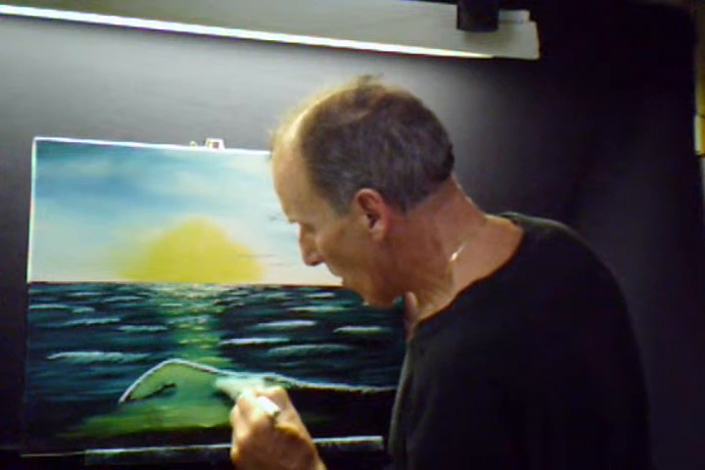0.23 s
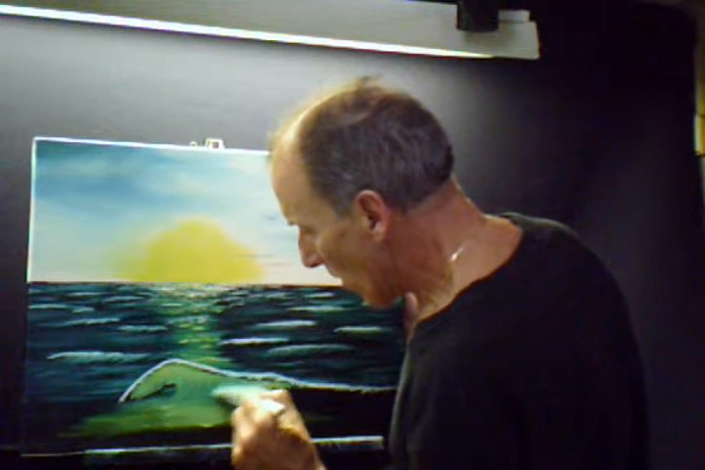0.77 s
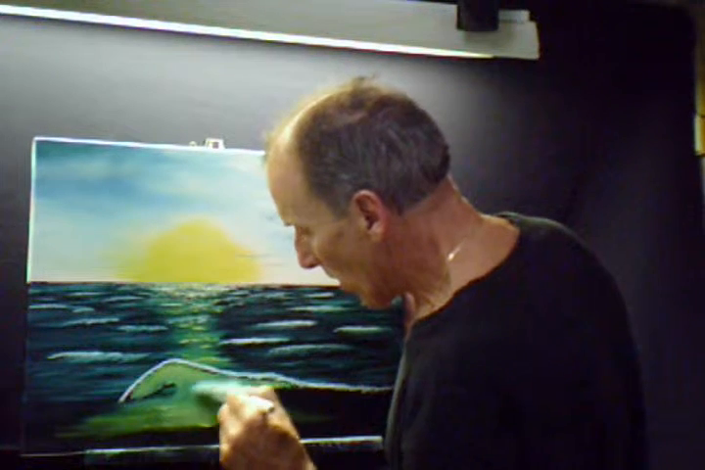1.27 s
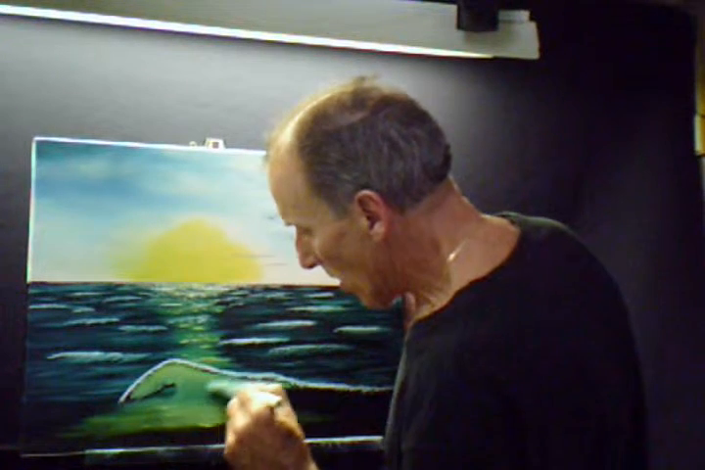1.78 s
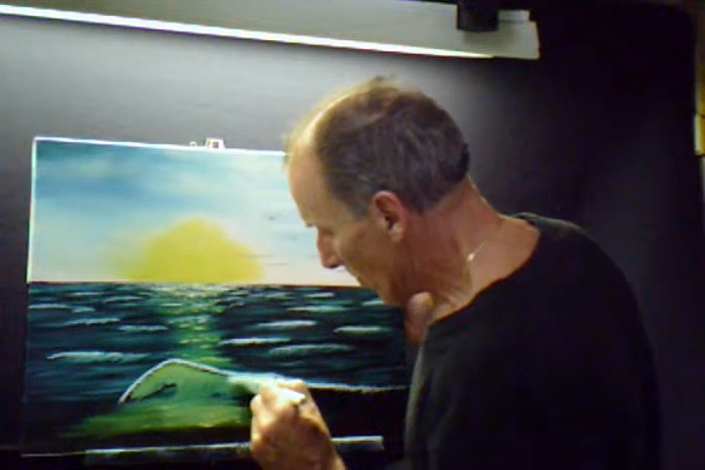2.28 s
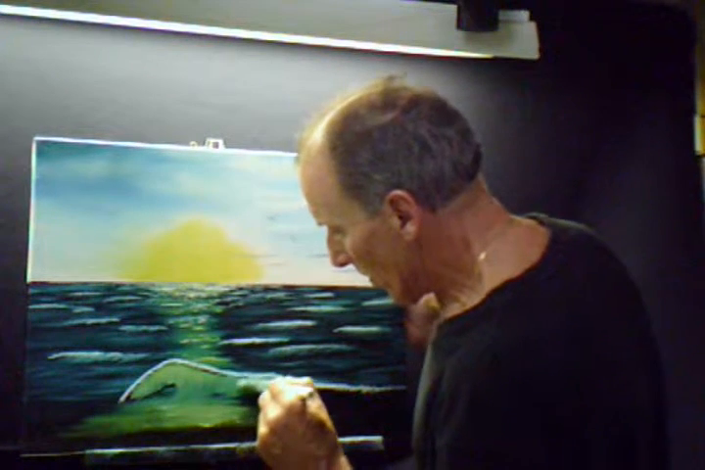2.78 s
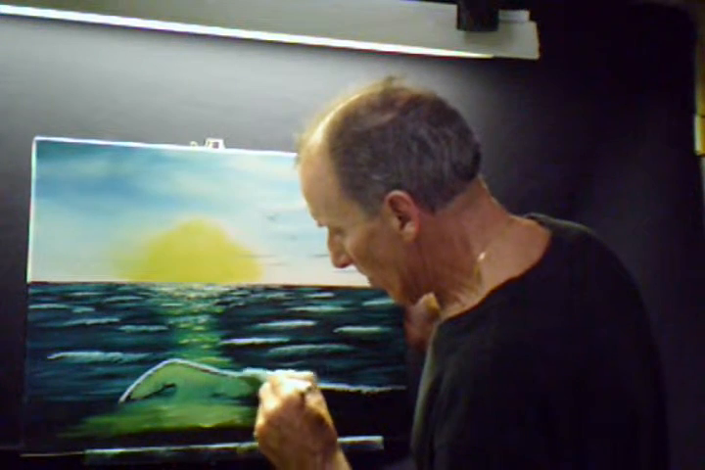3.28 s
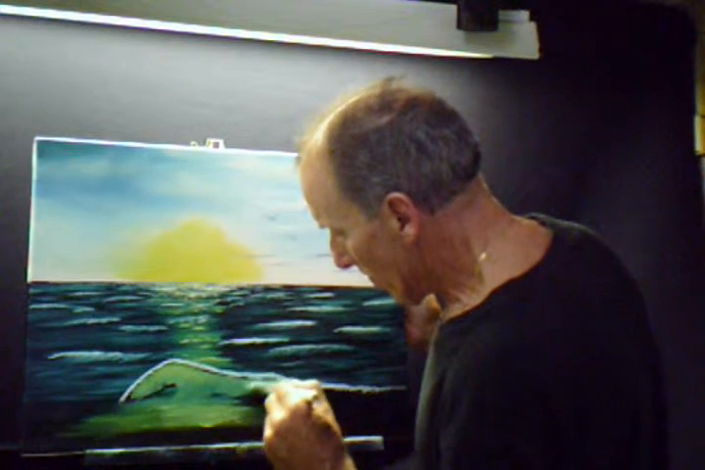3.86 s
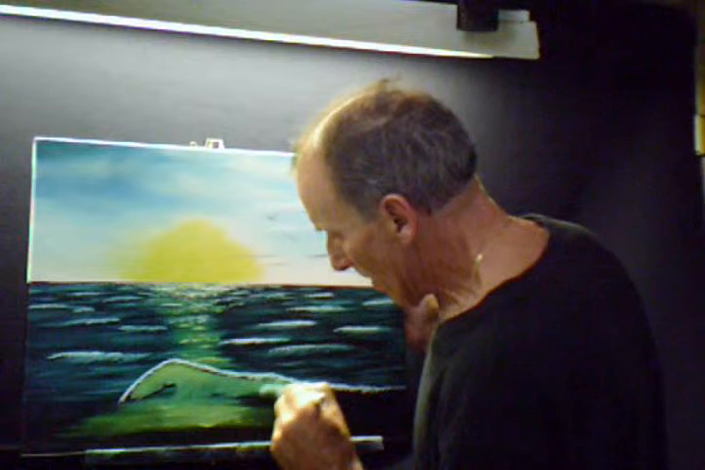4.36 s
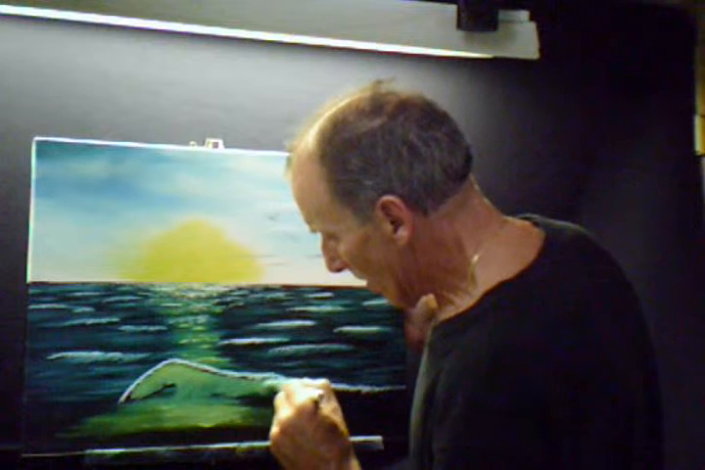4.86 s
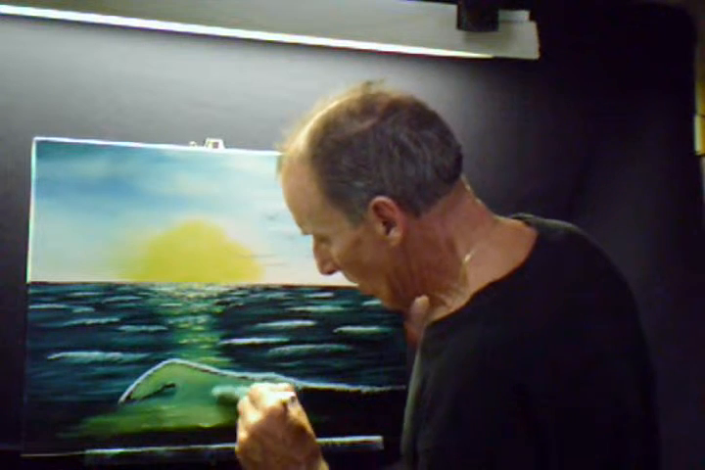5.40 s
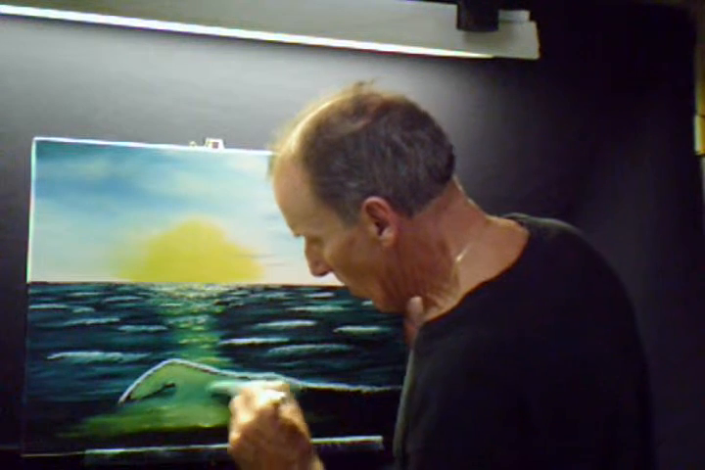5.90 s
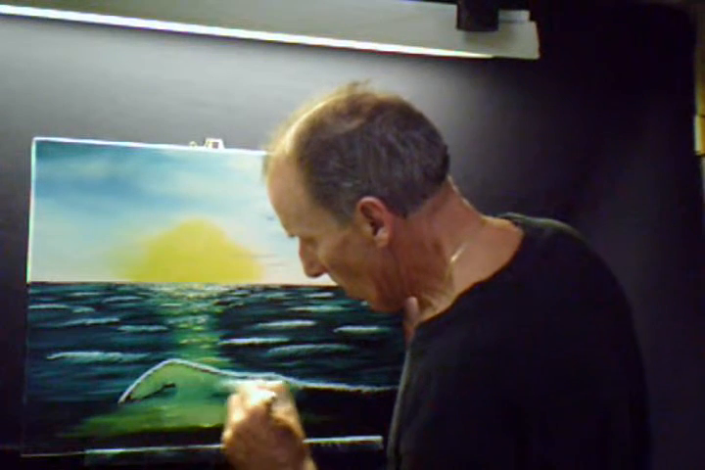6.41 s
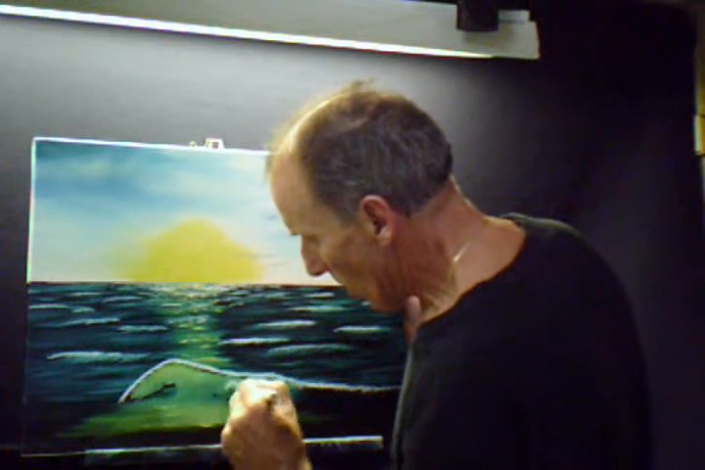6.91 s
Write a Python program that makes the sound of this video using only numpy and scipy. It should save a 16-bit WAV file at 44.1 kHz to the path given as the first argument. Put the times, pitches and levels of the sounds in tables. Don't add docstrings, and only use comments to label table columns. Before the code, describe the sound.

Quick blunt thuds, close and boomy, dominate from beginning to end, with no ringing and little audible room. Between them a small cheap microphone reveals its own noise: rumble, a low fluttering buzz, hiss pulsing about twenty times a second, faint steady whistles and very short sliding chirps. The level creeps upward and falls suddenly every second or so, sometimes with a muted click after a strong thump.

```python
import sys
import numpy as np
from scipy import signal
from scipy.fft import rfft, irfft
from scipy.io import wavfile
from scipy.ndimage import uniform_filter1d

SR = 44100
rng = np.random.default_rng(int(sys.argv[2]) if len(sys.argv) > 2 else 0)


def convert_level_to_amplitude(level_db):
    exponent = np.asarray(level_db, float) / 20
    return 10 ** exponent


def output_pcm(signal):
    pcm = np.clip(np.atleast_2d(signal).T, -1, 1) * 32767
    wavfile.write(sys.argv[1], SR, np.round(pcm).astype(np.int16))


N = 315182
LEAD = 1323
T_S = np.arange(N) / SR
EARLY_S = np.arange(-LEAD, N) / SR

# t/s, gain before/dB, gain after/dB, offset jump/full scale
GAIN_STEPS = [(0.0, 0.0, 0.8, 0.0), (0.2338, 3.5, -3.7, 0.0), (1.1394, 2.2, -6.9, -0.039),
              (2.2424, -0.6, -1.8, -0.004), (2.5442, 0.2, -0.6, -0.008), (2.9506, 0.6, -0.5, -0.009),
              (3.8561, 4.3, -6.2, -0.03), (4.7501, -1.8, 0.2, 0.003), (5.1332, 1.9, 3.2, -0.02),
              (5.4699, 4.6, -5.4, -0.034), (6.5729, -0.0, -2.9, -0.016), (7.15, 0.3, 0.0, 0.0)]
# t/s, length/ms, start f/Hz, end f/Hz, level/dB
BIRDIES = [(0.24, 18, 9140, 10360, -1), (0.447, 19, 1830, 7240, 0), (0.7378, 13, 4950, 9990, 0),
           (1.5439, 9.6, 7140, 11370, -3), (1.6517, 13, 7820, 8420, 0), (2.259, 13.5, 8250, 9980, -1),
           (2.5601, 15.5, 4650, 8550, 0), (2.9617, 12, 7940, 7600, -1), (3.0595, 16, 9120, 8050, -1),
           (4.262, 14, 4800, 9470, -4), (4.376, 16.5, 11370, 8300, -3), (4.7656, 7.1, 4940, 2560, 1),
           (5.4351, 7.2, 10300, 9400, 4.4), (5.8761, 15, 6700, 5800, 1.5), (6.0751, 25, 4960, 6180, -1.6),
           (6.578, 8.2, 6060, 4450, 2)]
# f/Hz, rms level/dB
WHINES = [(4200, -74), (5781, -80), (6200, -77), (7400, -77), (9600, -68.5), (10800, -84), (12450, -83)]
# f/Hz, density/dB per Hz
RUMBLE_SHAPE = [(2, -1), (5, 0.5), (18, -2), (50, -10), (100, -18), (300, -28), (700, -37), (2000, -46.5),
                (6000, -57)]
# f/Hz, density/dB per Hz
HISS_SHAPE = [(350, -22), (600, -4), (876, -9), (998, -6.5), (1580, -8), (3730, -9.5), (4250, -8.5),
              (7740, -10), (9530, -10), (12400, -30.5), (13600, -42)]
# rate f/Hz, start/cycle, end/cycle, load level/dB
CHORES = [
    (44.025, .31, .57, -22.6),
    (19.87, .26, .305, -27.5),
    (19.87, .7, .82, -31.1),
]
CHORE_LIMIT = 1.3

FRAME_HZ, BUSY_START, BUSY_SHARE = 19.87, .69, .57
RAMP_S, SETTLE_S, COUPLING_S, JUMP_S = .0046, .008, .0222, .06
THUMP_EVERY_S, FIRST_DUE_S, TICK_FRAMES, LONG_EVERY = .18195, -.044, 2, 3
TICK_S = TICK_FRAMES / FRAME_HZ
THUMP_START_S, SHORT_PUSH_S, LONG_PUSH_S, SLOP_S = -.0093, .0113, .0147, .0007
SHORT_DB, LONG_DB, HURRIED_DB, SCATTER_DB = -0.3, 0.27, -0.6, 0.67
TWEET_COUNT, TWEET_LOCKED, TWEET_LATE_S, TWEET_SPREAD_S = 50, .75, .046, .008
TWEET_MS, TWEET_HZ, TWEET_GLIDE_HZ, TWEET_DB = (6, 10.5), (4500, 11000), 2000, (-7, -1)


def thumps(load):
    held = np.repeat(rng.standard_normal(N // 60 + 1), 60)[:N]
    tremble = 1 + 0.13 * held + 0.023 * walk(200)
    total_load = load * np.append(np.ones(LEAD), tremble) + chores()
    dip = lag(total_load, SETTLE_S)
    return (lag(dip, COUPLING_S) - dip)[LEAD:]


def push():
    load = np.zeros(N + LEAD)
    for release_s, depth_db, push_ms in thump_rows():
        rise = np.clip((EARLY_S - release_s + push_ms / 1000) / RAMP_S, 0, 1)
        let_go = np.clip((release_s - EARLY_S) * SR, 0, 1)
        load += convert_level_to_amplitude(depth_db) * rise * let_go
    return load


def thump_rows():
    k = np.arange(int(N / SR / THUMP_EVERY_S) + 1)
    tick = np.ceil((FIRST_DUE_S + k * THUMP_EVERY_S) / TICK_S)
    late, longer, deeper = rng.standard_normal((len(k), 3)).T
    is_long = k % LONG_EVERY == 0
    hurried = np.diff(tick, prepend=-2) == 1
    length_s = np.where(is_long, LONG_PUSH_S, SHORT_PUSH_S) + SLOP_S * longer
    depth_db = np.where(is_long, LONG_DB, SHORT_DB) + HURRIED_DB * hurried + SCATTER_DB * deeper
    release_s = tick * TICK_S + THUMP_START_S + SLOP_S * late + length_s
    return zip(release_s, depth_db, 1000 * length_s)


def chores():
    load = 0
    for rate_hz, start, end, level_db in CHORES:
        cycle, phase = np.divmod(EARLY_S * rate_hz + 2, 1)
        scatter = np.minimum(rng.standard_normal(400), CHORE_LIMIT)
        weight = convert_level_to_amplitude(level_db + 4.3 * scatter[cycle.astype(int)])
        load = load + weight * (phase > start) * (phase < end)
    return load


def birdies(gate):
    sweeps = np.zeros(N)
    waver_hz = 350 * walk(900)
    for start_s, length_ms, from_hz, to_hz, level_db in list(BIRDIES) + tweet_rows():
        span = length_ms * SR / 1000 + 88
        u = np.arange(int(length_ms * SR / 1000) + 88) / span
        bend = u * u * (3 - 2 * u)
        glide_hz = (to_hz - from_hz) * (0.48 * u + 0.45 * bend)
        hz = from_hz + glide_hz + waver_hz[int(start_s * SR):][:len(u)]
        at = int(start_s * SR) - 44
        sweeps[at:at + len(u)] += convert_level_to_amplitude(level_db) * np.sin(np.pi * u) ** .5 * sweep(hz)
    stray_hz = np.abs(9000 + 6000 * walk(70))
    stray = gate * convert_level_to_amplitude(4.6 * walk(90)) * sweep(stray_hz)
    return dull(convert_level_to_amplitude(-50.5 + 2.0 * walk(500)) * sweeps + convert_level_to_amplitude(-59.5) * stray, 10500, order=6)


def tweet_rows():
    when, free, ms, hz, db = rng.random((TWEET_COUNT, 5)).T
    late, glide = rng.standard_normal((TWEET_COUNT, 2)).T
    free_s = TICK_S / 2 + when * (N / SR - 2 * TICK_S)
    locked_s = free_s // TICK_S * TICK_S + TWEET_LATE_S + TWEET_SPREAD_S * late
    start_s = np.where(free < TWEET_LOCKED, locked_s, free_s)
    from_hz = between(hz, TWEET_HZ)
    to_hz = from_hz + TWEET_GLIDE_HZ * glide
    return list(zip(start_s, between(ms, TWEET_MS), from_hz, to_hz, between(db, TWEET_DB)))


def whines(gate):
    tones = np.zeros(N)
    for hz, level_db in WHINES:
        tones += convert_level_to_amplitude(level_db + 1.5 * walk(300)) * np.sin(2 * np.pi * (hz * T_S + rng.random()))
    return convert_level_to_amplitude(6.0) * (.15 + gate) * tones


def busy():
    phase = (T_S * FRAME_HZ - BUSY_START) % 1 / BUSY_SHARE
    return uniform_filter1d(np.clip(1.2 + phase / 0.76, 0, 1) * (phase < 1), size=40)


def gain_control():
    step_s, before_db, after_db, _ = np.transpose(GAIN_STEPS)
    edge_s = np.repeat(step_s, 2) + np.tile([0, 2 / SR], len(step_s))
    return convert_level_to_amplitude(np.interp(T_S, edge_s, np.ravel([before_db, after_db], "F")))


def step_clicks():
    step_s, _, _, jump = np.transpose(GAIN_STEPS)
    kicks = np.zeros(N)
    kicks[np.minimum(step_s * SR + 1, N - 1).astype(int)] = jump * JUMP_S * SR
    return lag(kicks, JUMP_S)


def rumble(loaded):
    return convert_level_to_amplitude(0.61 * walk(22) + 3.1 * loaded) * noise(RUMBLE_SHAPE, -34)


def hiss(gain, gate, loaded):
    stir = convert_level_to_amplitude(0.93 * gate + 1.9 * loaded + 0.61 * walk(12))
    preamp = gain * stir * noise(HISS_SHAPE, -54.5)
    converter = stir ** 1.14 * noise(HISS_SHAPE, -59)
    return preamp + converter


def fizz(gate):
    shape = [(9000, -21), (10500, -4), (12500, -9), (14000, -42)]
    return convert_level_to_amplitude(5.3 * walk(150) + 3.7 * gate) * noise(shape, -79.5)


def noise(shape, rms_db):
    hz, density_db = np.transpose(shape)
    f_hz = np.maximum(np.arange(N // 2 + 1) * SR / N, 1)
    colour = convert_level_to_amplitude(np.interp(np.log(f_hz), np.log(hz), density_db))
    x = irfft(rfft(rng.standard_normal(N)) * colour, N)
    return x * convert_level_to_amplitude(rms_db) / x.std()


def walk(rate_hz):
    k = int(SR / rate_hz)
    held = np.repeat(rng.standard_normal(N // k + 1), k)
    return 1.3 * uniform_filter1d(uniform_filter1d(held, k), k)[:N]


def sweep(hz):
    return np.sin(2 * np.pi * np.cumsum(hz) / SR)


def between(share, ends):
    return ends[0] + share * (ends[1] - ends[0])


def lag(x, tau_s):
    k = np.exp(-1 / (tau_s * SR))
    return signal.lfilter([1 - k], [1, -k], x)


def dull(x, cutoff_hz, order):
    sos = signal.butter(order, cutoff_hz, fs=SR, output="sos")
    return signal.sosfilt(sos, x, zi=signal.sosfilt_zi(sos) * x[0])[0]


def scene():
    gain, load, gate = gain_control(), push(), busy()
    loaded = np.minimum(uniform_filter1d(load[LEAD:], size=900) * 3, 1)
    low = gain * thumps(load) + gain ** 1.19 * rumble(loaded) + step_clicks()
    mix = dull(low, 10500, order=5)
    mix = mix + birdies(gate) + gain ** 0.22 * whines(gate)
    mix = mix + hiss(gain, gate, loaded) + fizz(gate)
    return mix[None]


def low_pass(x):
    return signal.sosfilt(signal.butter(12, 13710, fs=SR, output="sos"), x)


def record(dry):
    rounded = dry[0] / (1 + np.abs(dry[0]) ** 14) ** (1 / 14)
    mix = dull(rounded, 13000, order=16)[None]
    return low_pass(mix)


dry = scene()
out = record(dry)
output_pcm(out)
```